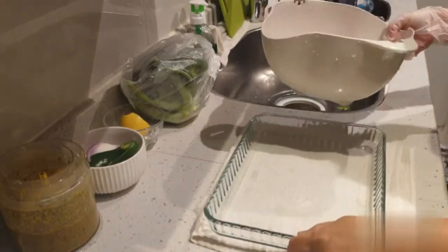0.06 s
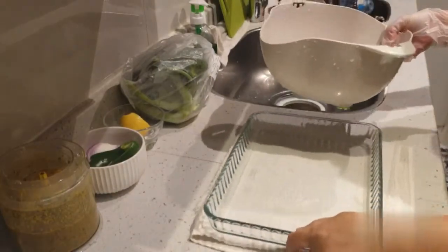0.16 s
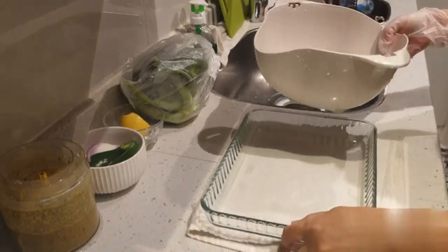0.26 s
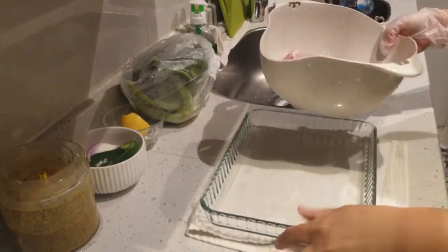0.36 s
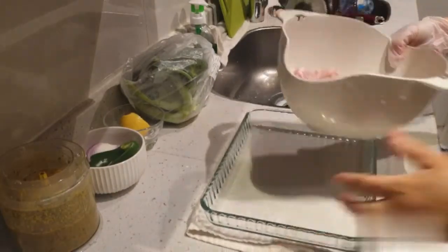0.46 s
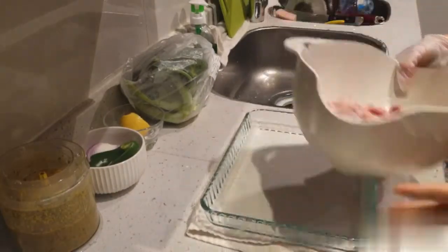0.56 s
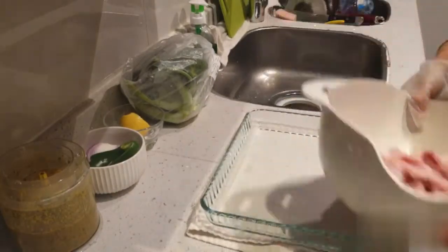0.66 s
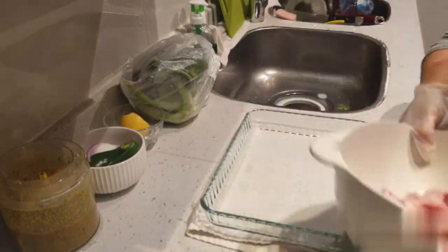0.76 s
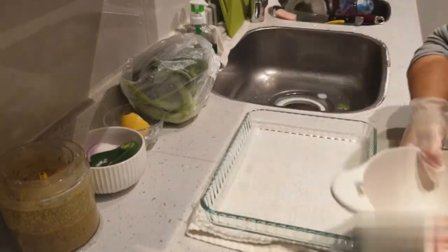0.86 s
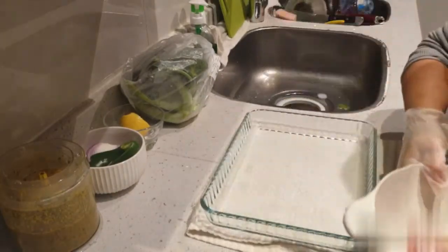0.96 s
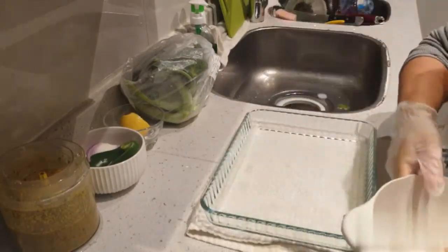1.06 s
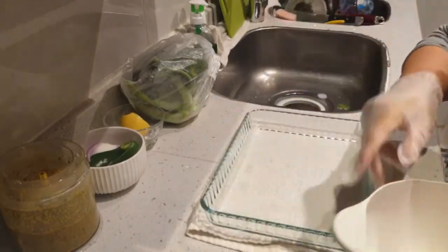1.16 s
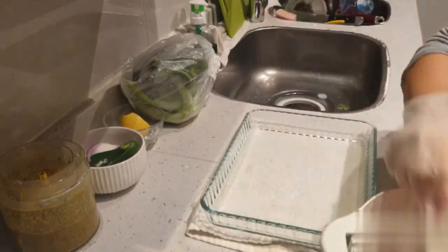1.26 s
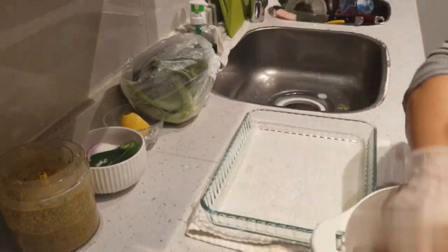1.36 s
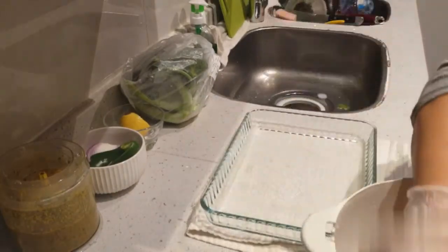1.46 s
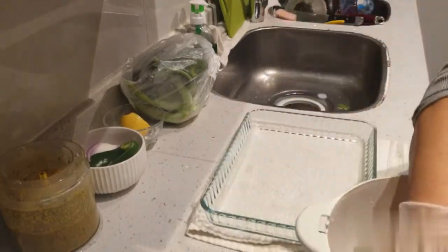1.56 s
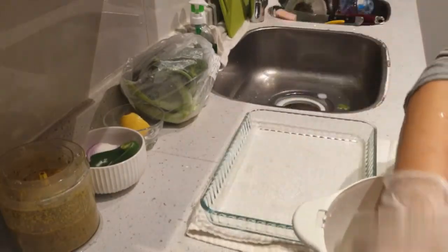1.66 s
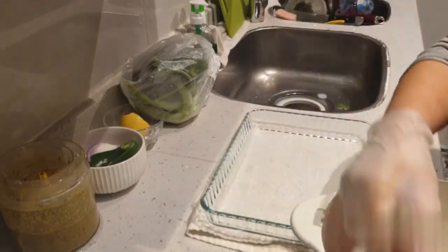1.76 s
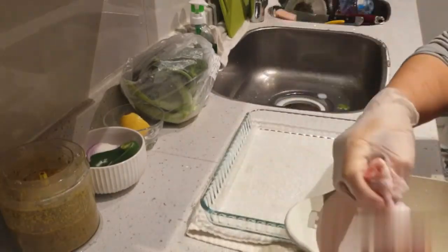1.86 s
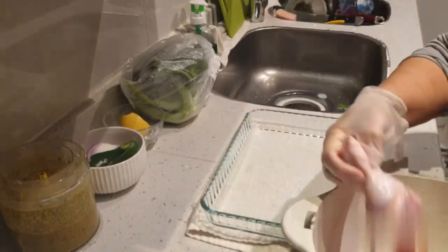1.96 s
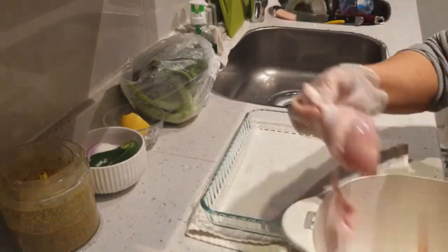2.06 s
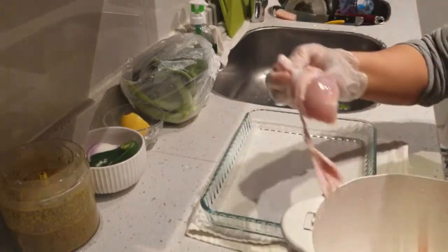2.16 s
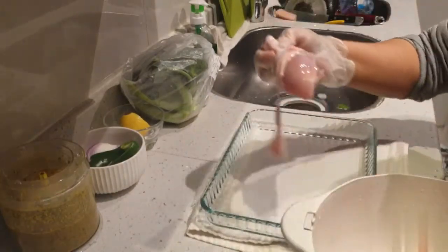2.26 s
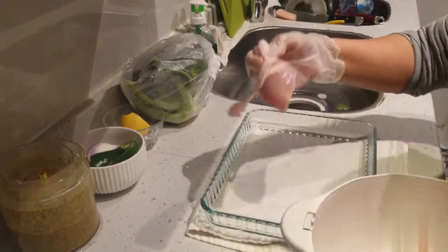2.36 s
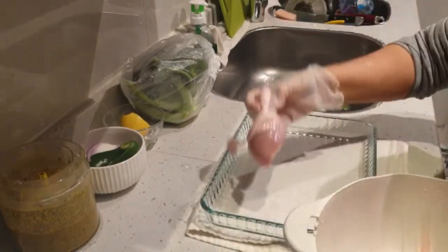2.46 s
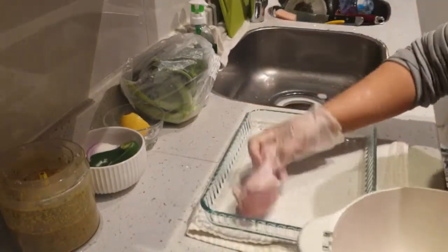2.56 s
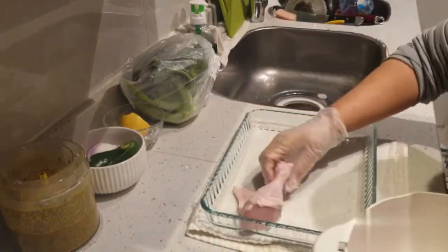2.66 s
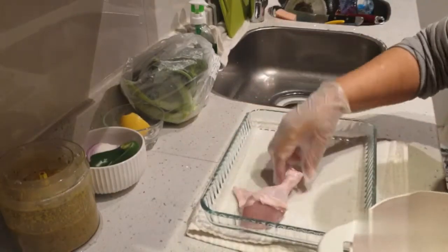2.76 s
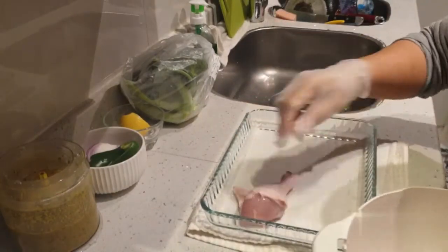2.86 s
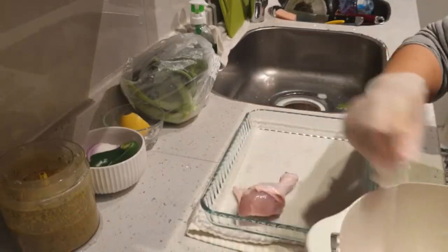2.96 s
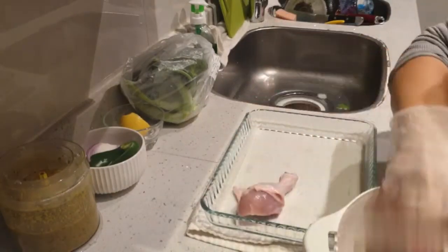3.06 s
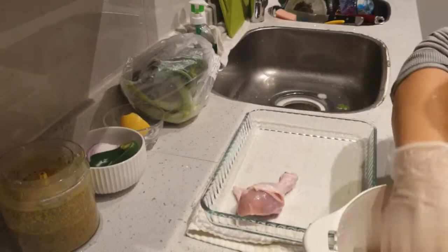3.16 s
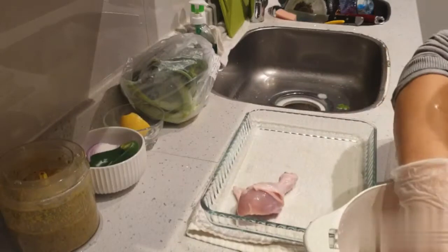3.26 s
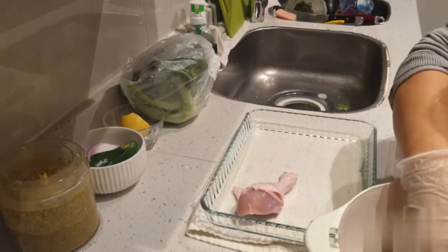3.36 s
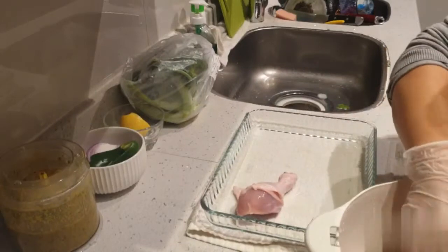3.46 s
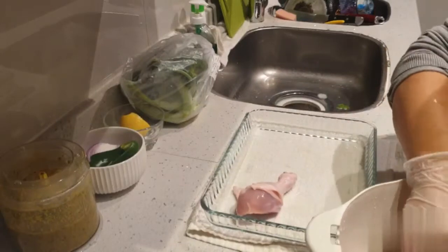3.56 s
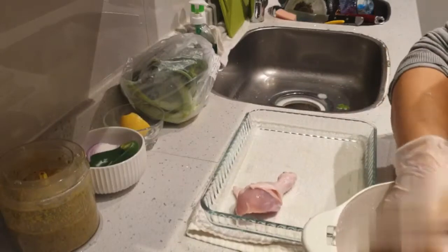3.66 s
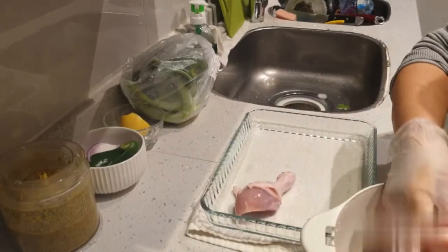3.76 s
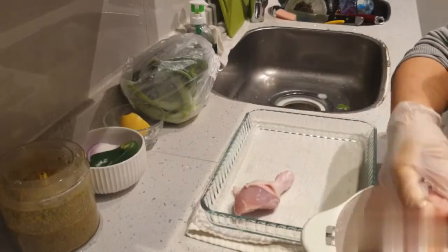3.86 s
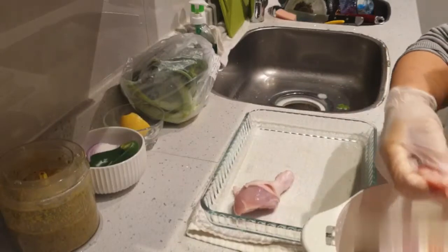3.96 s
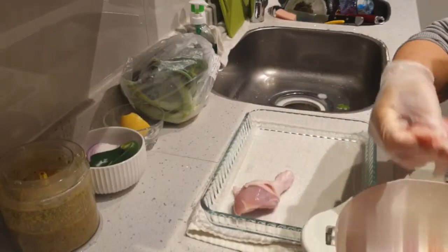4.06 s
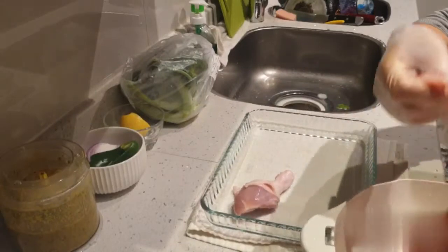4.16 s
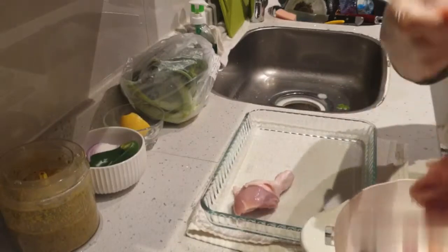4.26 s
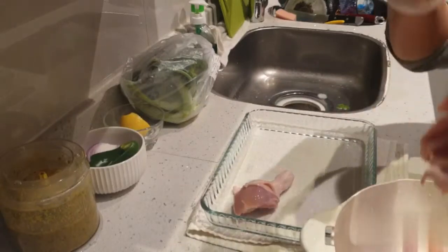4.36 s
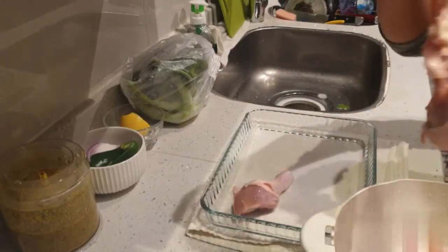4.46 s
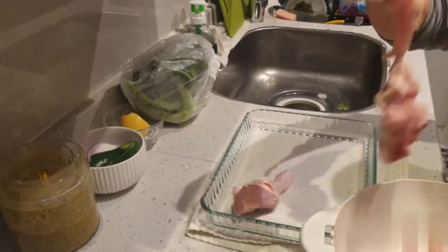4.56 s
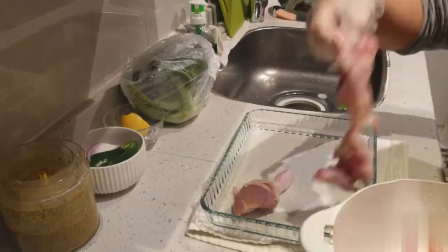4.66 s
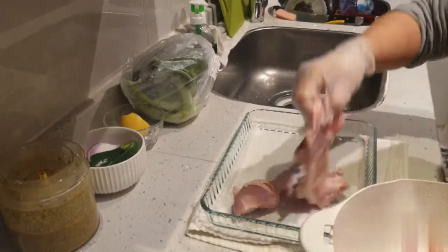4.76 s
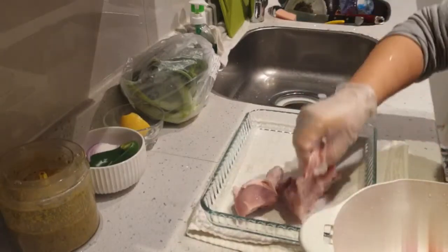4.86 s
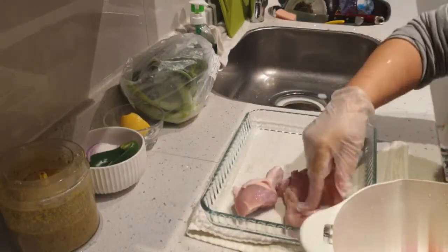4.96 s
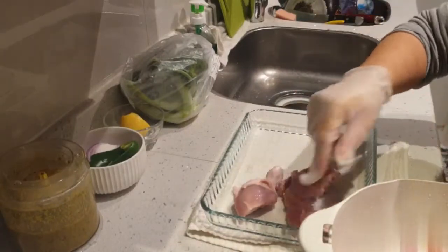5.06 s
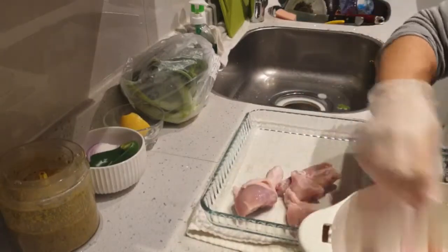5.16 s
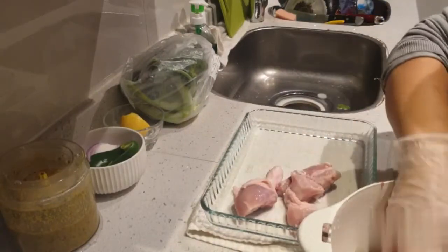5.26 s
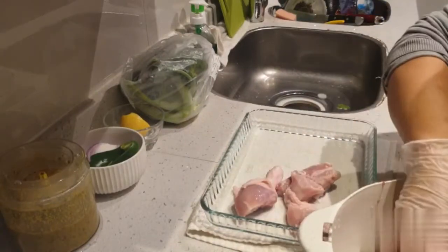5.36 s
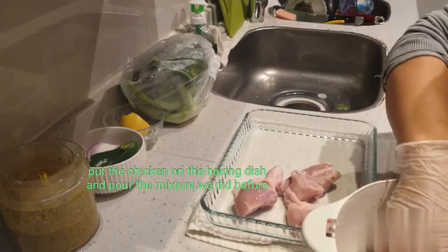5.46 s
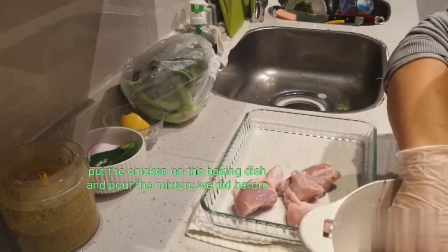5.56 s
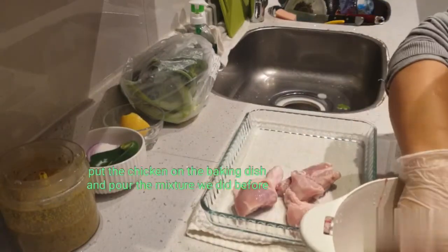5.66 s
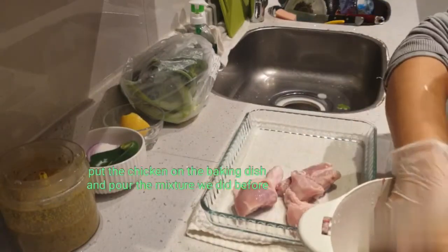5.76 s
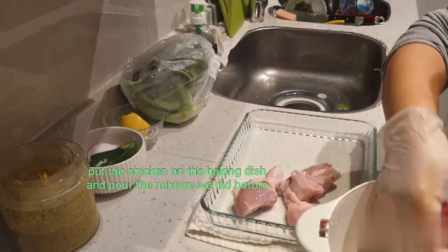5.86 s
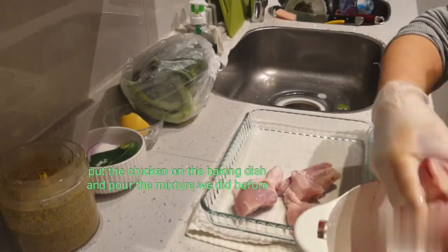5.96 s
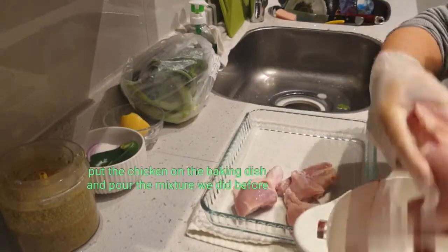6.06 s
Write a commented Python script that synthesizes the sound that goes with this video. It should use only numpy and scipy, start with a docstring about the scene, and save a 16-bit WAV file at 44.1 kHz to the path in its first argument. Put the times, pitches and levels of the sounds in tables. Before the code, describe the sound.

Close stereo microphone on a kitchen counter, with short hard reflections. Under everything runs a quiet low hum with faint air. Small sticky glove crackles lead to a solid bowl thump and several lighter bumps, wet squishing between them. A short rub ends in a sharp, heavy meat slap on the dish. Quieter squelches continue, then a short damped glass clink, and sticky crackles resume with a soft last bump.

```python
"""A motor hums steadily in a small, hard kitchen, over soft moving air: shaft orders and shaped noise.
Over it, from the start, a gloved hand squelches over raw chicken: crackles of tiny snaps, and wet smacks.
A plastic bowl is set down and rocks: knocks built from low thumps, ringing modes and bursts of noise.
The hand moves the meat into a glass dish: one piece slips free and slaps down, and another makes the
glass clink with short damped modes."""
import sys
import numpy as np
from scipy import signal
from scipy.fft import rfft, irfft, next_fast_len
from scipy.io import wavfile
from scipy.ndimage import uniform_filter1d, map_coordinates

SR = 44100
rng = np.random.default_rng(int(sys.argv[2]) if len(sys.argv) > 2 else 0)


def generate_wav(signal):
    """Clip the signal to [-1, 1] and save it as 16-bit WAV at the path in sys.argv[1]."""
    frames = np.transpose(np.atleast_2d(signal))
    scaled = np.clip(frames, -1, 1) * 32767
    pcm = np.round(scaled).astype(np.int16)
    wavfile.write(sys.argv[1], SR, pcm)


N = 269010  # length in samples

# Moving air, spectrum: f/Hz, relative level/dB
AIR_SPECTRUM = [(15, -63), (25, -32), (76, -5.5), (120, -9.5), (152, -3.5), (228, -17.5), (527, -13.5),
                (672, -17), (791, -20), (857, -14.5), (1040, -17), (1980, -29.5), (4450, -37.5),
                (11100, -51.5), (15800, -40)]
# Left-right likeness of the air: f/Hz, correlation
AIR_LIKENESS = [(100, 0.33), (500, 0.56), (1000, 0.0032), (1800, 0), (10000, 0)]
# Motor's three main tones, before trims and waver: t/s, hum level/dB, drone level/dB, whine level/dB
MOTOR_LEVELS = [(0.0, -51, -67.5, -60), (0.46, -52.5, -58, -60.5), (1.0, -53.5, -62.5, -71.5),
                (1.83, -55.5, -59.5, -72.5), (2.41, -51, -65, -67.5), (3.18, -56.5, -76, -70.5),
                (4.25, -58.5, -74.5, -63.5), (4.62, -54, -61.5, -58.5), (4.98, -54.5, -80, -61.5),
                (5.4, -62, -91, -67), (6.1, -55, -74, -65)]
# Motor's faint shaft orders, before waver: multiple of shaft speed, level/dB
FAINT_ORDERS = [(8, -79.5), (10, -78.5), (13, -75), (14, -79), (15, -78), (16, -70.5), (17, -77),
                (24, -77.5), (27, -77.5)]
# Hand gripping or sliding over meat, before trims: t/s, hold/s, glove fizz level/dB, wet squish level/dB
GRIP_EVENTS = [(0.0, 0.1, -72, -66.5), (.2, 0.16, -82.5, -69.5), (1.205, 0.11, -58, -59.5),
               (1.473, .11, -61, -62.5), (1.599, 0.077, -59.5, -56.5), (1.77, 0.1, -64, -67.5),
               (1.971, 0.023, -60, -57.5), (2.656, 0.092, -58.5, -60), (2.933, 0.19, -68.5, -72),
               (3.284, 0.053, -62, -75), (3.372, 0.2, -60, -62.5), (3.71, 0.059, -67.5, -85),
               (3.846, 0.093, -69, -66.5), (4.853, 0.048, -65, -60.5), (5.016, 0.066, -68, -73),
               (5.247, 0.081, -62, -61), (5.47, 0.062, -62, -66.5), (5.586, 0.25, -59.5, -62)]
# Bright fizz of glove and spray, spectrum: f/Hz, relative level/dB
FIZZ_SPECTRUM = [(2350, -28), (4000, -8), (4780, -3.5), (5360, -10), (9980, -5.5), (11700, -7.5),
                 (15200, -4), (15800, -0.5)]
# Wet squish, also the dish's contact tick, spectrum: f/Hz, relative level/dB
SQUISH_SPECTRUM = [(700, -15), (1500, 6), (2600, -0.5), (3400, -1), (4300, 8), (5400, -27), (8000, -15.5)]
# Wet smacks and glove snaps, before trims: t/s, cavity level/dB, cavity f/Hz, spray level/dB
SMACK_EVENTS = [(0.201, -60, 2720, -87), (0.76, -48.5, 3400, -83), (0.78, -47.5, 3130, -85),
                (0.932, -44.5, 4070, -53.5), (1.409, -47.5, 2100, -82), (1.625, -52, 2350, -42),
                (1.765, -62, 3550, -57), (1.901, -57, 1100, -76), (1.992, -46.5, 1250, -60),
                (2.177, -57, 4140, -85), (2.385, -52.5, 2770, -67), (2.638, -25, 2300, -30.5),
                (2.671, -41, 2490, -32), (2.672, -37.5, 5450, -42), (3.111, -56, 2750, -81),
                (3.528, -78, 4960, -52), (3.771, -61, 2390, -61), (3.842, -58, 4060, -53),
                (3.932, -65, 2490, -59), (4.564, -54.5, 2750, -81), (5.009, -77, 1690, -51.5),
                (5.228, -55.5, 1660, -53), (5.25, -59, 2320, -49), (5.256, -45, 830, -75),
                (5.291, -53, 2950, -56), (5.573, -48.5, 2600, -51), (5.875, -52, 1750, -76),
                (6.019, -56.5, 2800, -80), (6.048, -51.5, 746, -78), (6.064, -59, 2640, -70),
                (6.086, -45.5, 1440, -76)]
# Bowl wall stirred by a smack, spectrum: f/Hz, relative level/dB
WALL_SPECTRUM = [(400, 4), (1600, 8.5), (4500, 0.0), (7000, -47)]
# Sliding glove, spectrum: f/Hz, relative level/dB
GLOVE_SPECTRUM = [(1000, -5.5), (3000, -10), (4500, -1.5), (5400, -13), (6200, -5), (7500, -16.5),
                  (15000, -17)]
# Taps on the glass dish, before trims: t/s, level/dB
CLINK_EVENTS = [(4.81, -40), (4.836, -26)]
# Glass dish modes: f/Hz, relative level/dB, t60/s
GLASS_MODES = [(1006, -5, 0.11), (1653, 4, 0.097), (1730, 5, 0.088), (2564, 2.5, 0.066), (2620, -5.5, 0.13),
               (2940, -5, 0.071), (3270, -7, 0.12), (3780, -15, 0.059), (4290, -10, 0.24),
               (4414, -3.5, 0.11), (5210, -16, 0.14), (5730, -23, 0.12)]
# The dish's blurred weak modes, spectrum: f/Hz, relative level/dB
SHIMMER_SPECTRUM = [(500, -21), (1000, 2), (3200, -4), (6000, -11), (10000, -23), (15000, -23)]
# Blows that reach the counter, before trims: t/s, thump level/dB, slap level/dB, thump f/Hz
KNOCK_EVENTS = [(1.174, -19.5, -22, 105), (1.208, -37, -33.5, 115), (1.409, -24.5, -43, 104),
                (1.552, -33.5, -45.5, 108), (1.590, -27, -49, 110), (1.900, -33, -45.5, 116),
                (1.994, -44.5, -50, 162), (2.247, -39.5, -55.5, 117), (2.637, -19, -20, 117),
                (2.67, -36.5, -51, 95), (3.100, -38, -51, 123), (4.216, -48.5, -63, 120),
                (4.81, -44.5, -54.5, 79.4), (5.246, -67, -49, 100), (6.048, -44, -46, 128)]
# Counter and what stands on it, modes: f/Hz, relative level/dB, t60/s
COUNTER_MODES = [(178.4, 4, 0.32), (239.3, -9.5, 0.47), (292.5, 1, 0.31), (404, 2.5, 0.089),
                 (482.2, -4.5, 0.27), (537, -11, 0.4), (569, -4.5, 0.24), (832, -3, 0.19),
                 (850, -10, 0.085), (1000, -5, 0.05), (1085, -3, 0.076)]
# Counter's deep panel modes: f/Hz, relative level/dB, t60/s
BOOM_MODES = [(66.5, -8, 0.26), (91.3, 5, 0.31), (124, -1, 0.16), (152.2, -5.5, 0.54)]
# Hollow knock of bowl or dish on the counter, modes: f/Hz, relative level/dB, t60/s
HOLLOW_MODES = [(348, -5.5, 0.16), (415, 0, 0.059), (454, -7, 0.023), (685, -14, 0.051)]
# Slap of a hard contact, spectrum: f/Hz, relative level/dB
SLAP_SPECTRUM = [(150, -16.5), (250, -6.5), (509, -15.5), (649, -5.5), (951, -2.5), (1300, -17.5),
                 (1600, -14.5), (2040, -24.5), (2430, -19), (2790, -22), (3370, -21.5), (4450, -21.5),
                 (5680, -33.5), (9390, -41.5), (15800, -90)]
# Kitchen echo: f/Hz, t60/s
KITCHEN_DECAY = [(100, 0.62), (500, 0.32), (2000, 0.28), (5000, 0.18), (14000, 0.12)]
# Colour of the two ports: f/Hz, left minus right level/dB
PORT_BALANCE = [(120, 6), (280, 0), (450, -1.5), (1000, -1.5), (2600, 0), (4400, 7), (6000, -5), (8500, -8),
                (10500, -6), (13000, 7.5), (15500, -2)]

SHAFT_HZ = 32.92
HUM_DB, DRONE_DB, WHINE_DB = 0, -0.5, 2.5  # trims
GRIP_RISE_DB_PER_S, GRIP_FALL_DB_PER_S = 298, 143
FIZZ_DB, SQUISH_DB = -3.5, -8.5  # trims
CLUMP_DB, CLUMPS_PER_S, PATCHY_DB = 2, 49, 2.5
SMACK_S, SMACK_REF_DB, HALVING_DB = 0.022, -51, 15  # time to fall 30 dB at the reference; dB per halving
SLIP_S, SLIP_DB = 2.566, -44  # a drumstick slides out of the glove and comes free
SLIP_RISE_DB_PER_S, SLIP_FALL_DB_PER_S = 661, 1700
THUMP_DB, SWELL_S = 5.5, 0.0075  # counter's heave: trim, time to its crest
RETURN_S, RETURN_DB = 0.0344, -11.5  # the heave comes back once from the far wall
BOOM_DB, BOOM_RISE_S = -4.5, 0.076  # trim relative to the thump, rise time constant
HOLLOW_DB = 0.5  # trim relative to the slap
RING_DB, RING_SLAP_SHARE = -0.5, 0.46  # counter's ring: trim, slap's share of its level in dB
SLAP_DB, SLAP_T60_S, CONTACT_S = 1, 0.051, 0.00097
BASS_CUT_HZ, TOP_HZ = 81, 15900  # knock high-pass, overall band limit


def amp(db):
    """Decibels to gain."""
    return 10 ** (np.asarray(db) / 20)


def unit(x):
    """Scale to rms 1."""
    return x / np.sqrt(np.mean(x ** 2) + 1e-20)


def along(points, hz):
    """Read (f/Hz, value) points along a log frequency axis."""
    f, value = np.transpose(points)
    return np.interp(np.log(hz + 1), np.log(f + 1), value)


def curves(rows):
    """One value per sample for each column after the time."""
    s, *columns = np.transpose(rows)
    return [np.interp(np.arange(N) / SR, s, column) for column in columns]


def wobble(rate):
    """A smooth random curve with the given number of knots a second."""
    knots = rng.standard_normal(int(N * rate / SR) + 4)
    coarse = np.arange(0, len(knots), 1 / 8)
    smooth = map_coordinates(knots, [coarse], mode="nearest")
    return np.interp(np.arange(N) * rate / SR, coarse, smooth)


def filtered(x, response):
    """Multiply the spectrum of x by a response of frequency."""
    n = x.shape[-1]
    padded = next_fast_len(n + SR // 20, True)
    hz = np.fft.rfftfreq(padded, 1 / SR)
    return irfft(rfft(x, padded) * response(hz), padded)[..., :n]


def coloured(x, spectrum):
    """Shape x by a spectrum, at rms 1."""
    return unit(filtered(x, lambda hz: amp(along(spectrum, hz))))


def add(track, s, sound):
    """Mix a sound into the track from time s."""
    start = round(s * SR)
    track[:, start:start + sound.shape[-1]] += sound[:, :N - start]


def stroke(s, length, rise, fall):
    """Gain that rises to 1 at time s, holds for a length and falls; slopes in dB per second."""
    t = np.arange(0, N, 64) / SR
    gain_db = -rise * np.maximum(s - t, 0) - fall * np.maximum(t - s - length, 0)
    return np.interp(np.arange(N) / SR, t, amp(gain_db))


def ring(modes, t, scatter_db, apart_hz, opposed):
    """Damped modes at two ports, whose phases part with frequency up to apart_hz by the opposed share."""
    hz, db, t60 = np.transpose(modes)[:, :, None]
    apart = np.pi / 2 * np.minimum((hz / apart_hz) ** 2, 1)
    start = apart * rng.uniform(-2, 2, hz.shape)
    split = apart * (opposed + rng.uniform(-0.1, 0.1, hz.shape))
    fade = amp(db + scatter_db * rng.standard_normal(hz.shape) - 60 * t / t60)
    phase = 2 * np.pi * hz * t + start
    pair = np.array([(fade * np.sin(phase + side * split)).sum(0) for side in (-1, 1)])
    return pair / np.linalg.norm(amp(db))


def room(x, wet_db):
    """Add the kitchen's echo, a noise tail with each frequency dying at its own speed."""
    hz, t, z = signal.stft(rng.standard_normal((2, SR // 2)), SR, nperseg=256)
    decay = amp(-60 * t / along(KITCHEN_DECAY, hz)[:, None])
    tail = signal.istft(z * decay, SR, nperseg=256)[1]
    tail *= 1 - np.exp(-np.arange(tail.shape[1]) / SR / 0.00053)
    echo = signal.fftconvolve(x, tail / np.linalg.norm(tail[0]), axes=1)[:, :x.shape[1]]
    return x + amp(wet_db) * echo


def patchy(x, depth_db):
    """Let the colour of x shift at random from moment to moment."""
    z = signal.stft(x, nperseg=256)[2]
    field = uniform_filter1d(rng.standard_normal(z.shape[1:]), size=12, axis=0)  # across frequency
    field = uniform_filter1d(field, size=24, axis=1)  # across time
    return signal.istft(z * amp(depth_db * unit(field)), nperseg=256)[1][:, :N]


def crackle(spectrum, rate, spread_db, blur, cycles):
    """Tiny wet snaps, each at its own pitch and size and unequal at the two ports, on a soft hiss."""
    when, pitch, size, turn = rng.random((int(rate * N / SR), 4)).T[:, :, None]
    lowest, highest = spectrum[0][0], spectrum[-1][0]
    hz = lowest + pitch * (highest - lowest)
    step = np.arange(SR // 500)
    fade = amp(spread_db * size ** 2 - 60 * step / SR * hz / cycles)  # 60 dB down after these cycles
    pops = fade * np.sin(2 * np.pi * hz * step / SR)
    slots = ((when * N).astype(int) + step).ravel()
    pair = np.array([np.bincount(slots, (pops * port(2 * np.pi * turn)).ravel(), N)[:N]
                     for port in (np.cos, np.sin)])
    return coloured(unit(pair) + blur * rng.standard_normal((2, N)), spectrum)


def air():
    """Moving air as shaped noise, partly shared by the ports below 1 kHz, most near 500 Hz."""
    def mid_side(hz):
        turn = np.arccos(np.clip(along(AIR_LIKENESS, hz), -1, 1)) / 2
        return np.array([np.cos(turn), np.sin(turn)])

    mid, side = filtered(rng.standard_normal((2, N)), mid_side)
    level = amp(-62.0 + 0.13 * wobble(1.9))
    return level * coloured(np.array([mid + side, mid - side]), AIR_SPECTRUM)


def motor():
    """A hum at four times the shaft speed, with higher orders that swell and fade in the room."""
    hum_db, drone_db, whine_db = curves(MOTOR_LEVELS)
    shaft = 2 * np.pi * np.cumsum(SHAFT_HZ + 0.04 * wobble(4)) / SR  # phase in radians

    def line(order, db, waver_db):
        level = amp(db + waver_db * wobble(7))
        return level * np.sqrt(2) * np.sin(order * shaft + rng.uniform(0, 2 * np.pi))

    hum = line(order=4, db=hum_db + HUM_DB, waver_db=1.55)
    drone = line(order=12, db=drone_db + DRONE_DB, waver_db=-0.7)
    whine = line(order=26, db=whine_db + WHINE_DB, waver_db=0.7)
    faint = sum(line(order=round(k), db=db, waver_db=4.5) for k, db in FAINT_ORDERS)
    return hum + whine + faint + drone * amp([[-2], [2]])  # drone leans right


def squelch():
    """With each grip, wet skin and the thin glove stick and peel in small clumps."""
    grips = np.array([stroke(s, length, GRIP_RISE_DB_PER_S, GRIP_FALL_DB_PER_S)
                      for s, length, *_ in GRIP_EVENTS])
    glove, wet = np.sqrt(amp(np.transpose(GRIP_EVENTS)[2:]) ** 2 @ grips ** 2)  # grips add as power
    clumps_db = CLUMP_DB * wobble(CLUMPS_PER_S)
    fizz = crackle(FIZZ_SPECTRUM, rate=1600, spread_db=14.5, blur=1.0, cycles=44)
    fizz *= glove * amp(FIZZ_DB + clumps_db)
    squish = crackle(SQUISH_SPECTRUM, rate=500, spread_db=11.5, blur=1.0, cycles=8.5)
    squish *= wet * amp(SQUISH_DB + clumps_db)
    return room(patchy(fizz + squish, PATCHY_DB), wet_db=-3.0)


def slip():
    """A piece slides through the glove: grainy rubbing noise swells steeply, then stops as it comes free."""
    slide = stroke(SLIP_S, 0, SLIP_RISE_DB_PER_S, SLIP_FALL_DB_PER_S)
    grainy = rng.standard_normal((2, N)) * amp(2.7 * wobble(600))
    rub = coloured(grainy, GLOVE_SPECTRUM)
    return room(amp(SLIP_DB) * slide * rub, wet_db=-2)


def smacks():
    """A wet film parts: tiny snaps pop in a small cavity, stir the bowl's wall and spray treble."""
    track, t = np.zeros((2, N)), np.arange(SR // 8) / SR
    for s, db, hz, spray_db in SMACK_EVENTS:
        grain = map_coordinates(rng.standard_normal(len(t)), [t * 900])
        snaps = rng.standard_normal((2, len(t))) * amp(4.9 * grain)
        # one damped resonance
        cavity = unit(filtered(snaps, lambda f: 1j * f / (hz * hz - f * f + 1j * f * hz * 0.18)))
        wall = coloured(snaps[::-1], WALL_SPECTRUM)
        spray = coloured(snaps, FIZZ_SPECTRUM)
        # stronger smacks are shorter
        age = t / SMACK_S * 2 ** ((max(db, spray_db) - SMACK_REF_DB) / HALVING_DB)
        fade = amp(-30 * age) * (1 - np.exp(-10 * age))
        pop = amp(db) * (cavity + amp(-4.0) * wall)
        add(track, s, (pop + amp(spray_db + 3.0) * spray) * fade)
    return room(track, wet_db=-2.5)


def clinks():
    """The dish rings briefly, damped by meat and the towel under it; weak modes blur into a shimmer."""
    track, t = np.zeros((2, N)), np.arange(SR // 4) / SR
    for s, db in CLINK_EVENTS:
        tick = amp(-12.5 - 60 * t / 0.02) * coloured(rng.standard_normal((2, len(t))), SQUISH_SPECTRUM)
        shimmer = amp(-18.5 - 60 * t / 0.14) * coloured(rng.standard_normal((2, len(t))), SHIMMER_SPECTRUM)
        glass = ring(GLASS_MODES, t, scatter_db=1.5, apart_hz=1500, opposed=0.45)
        add(track, s, amp(db - 4.0) * (glass + tick + shimmer))
    return room(track, wet_db=-8)


def knocks():
    """Blows heave the counter for a few cycles and ring it; hard contact adds a slap and a hollow knock."""
    solid, airborne, t = np.zeros((2, N)), np.zeros((2, N)), np.arange(SR // 3) / SR
    contact = 1 - np.exp(-t / CONTACT_S)
    for s, thump_db, slap_db, hz in KNOCK_EVENTS:
        def heave(u):
            swell = (u / SWELL_S * np.exp(1 - u / SWELL_S)) ** 3
            return swell * np.sin(2 * np.pi * hz * u)

        returned = amp(RETURN_DB) * heave(np.maximum(t - RETURN_S, 0))
        thump = amp(thump_db + THUMP_DB) * (heave(t) + returned)
        boom = amp(thump_db + BOOM_DB) * ring(BOOM_MODES, t, scatter_db=2, apart_hz=600, opposed=0.88)
        boom *= 1 - np.exp(-t / BOOM_RISE_S)
        hollow = amp(slap_db + HOLLOW_DB) * ring(HOLLOW_MODES, t, scatter_db=4.0, apart_hz=960, opposed=1.0)
        force_db = thump_db + RING_SLAP_SHARE * (slap_db - thump_db)
        body = amp(force_db + RING_DB) * ring(COUNTER_MODES, t, scatter_db=2.0, apart_hz=852, opposed=0.66)
        slap = coloured(rng.standard_normal((2, len(t))), SLAP_SPECTRUM)
        slap *= amp(slap_db + SLAP_DB - 60 * t / SLAP_T60_S)
        add(solid, s, thump + boom + (body + hollow) * contact)
        add(airborne, s, slap * contact)
    # the microphones pick up little of the deepest bass
    bass_cut = signal.butter(N=4, Wn=BASS_CUT_HZ, btype="highpass", fs=SR, output="sos")
    return signal.sosfilt(bass_cut, solid) + room(airborne, wet_db=-5.0)


def scene():
    """Everything heard at the counter; the left port lags the right in phase for the steady sounds."""
    lag = np.exp(0.18j * np.array([[-1], [1]]))  # radians, the same at every frequency
    steady = filtered(air() + motor(), lambda hz: lag)
    return steady + squelch() + slip() + smacks() + clinks() + knocks()


def record(dry):
    """The two ports colour the sound differently; nothing passes above the band limit."""
    half = np.array([[0.5], [-0.5]])  # left and right each take half the difference
    return filtered(dry, lambda hz: amp(along(PORT_BALANCE, hz) * half) * (hz < TOP_HZ))


dry = scene()
out = record(dry)
generate_wav(out)
```